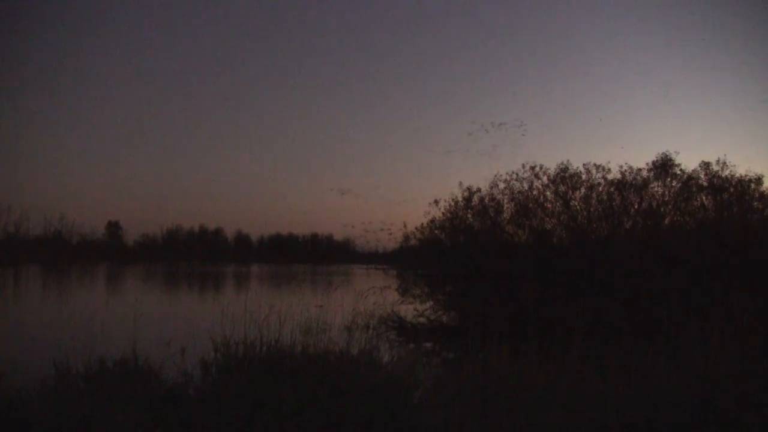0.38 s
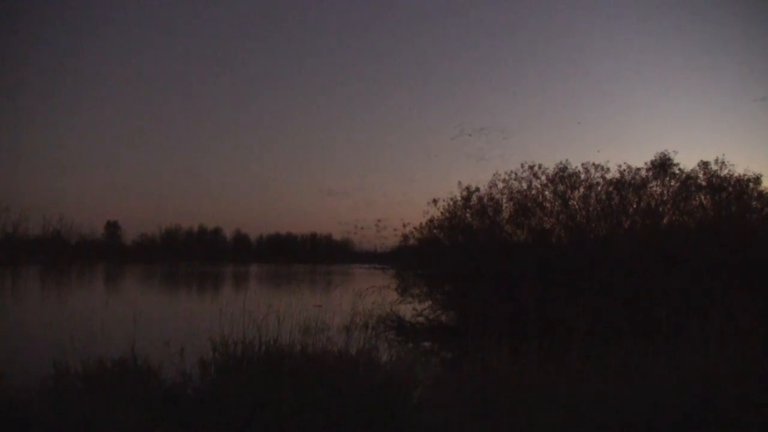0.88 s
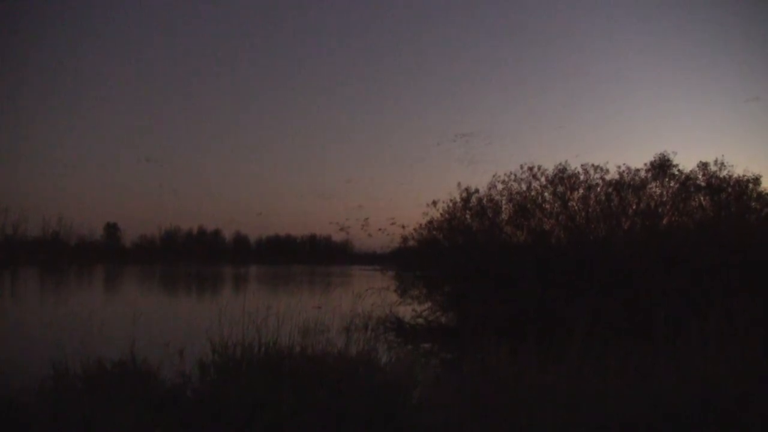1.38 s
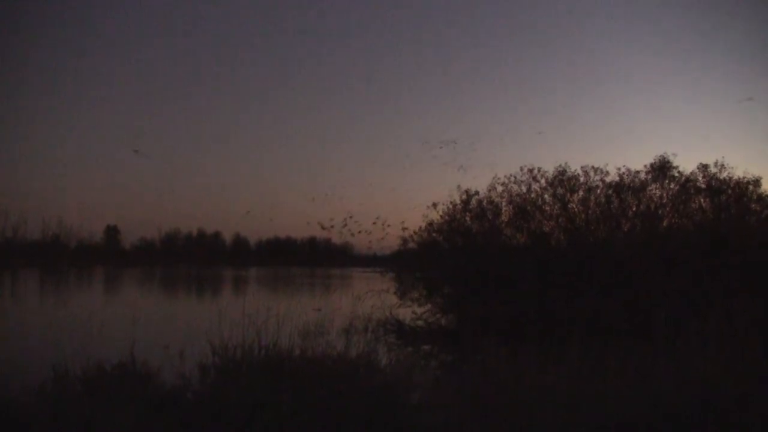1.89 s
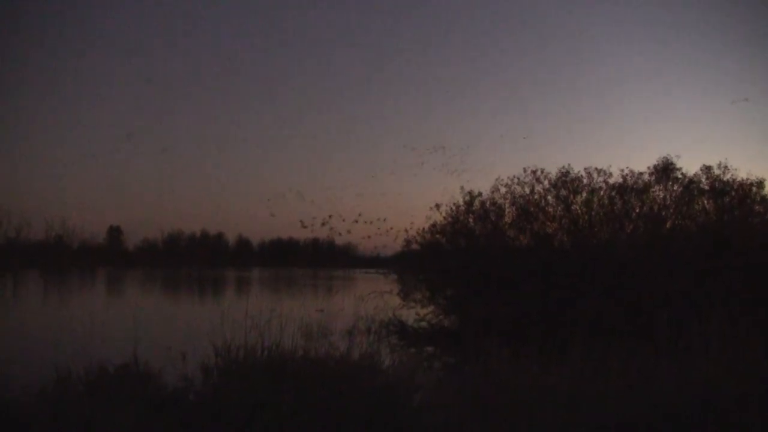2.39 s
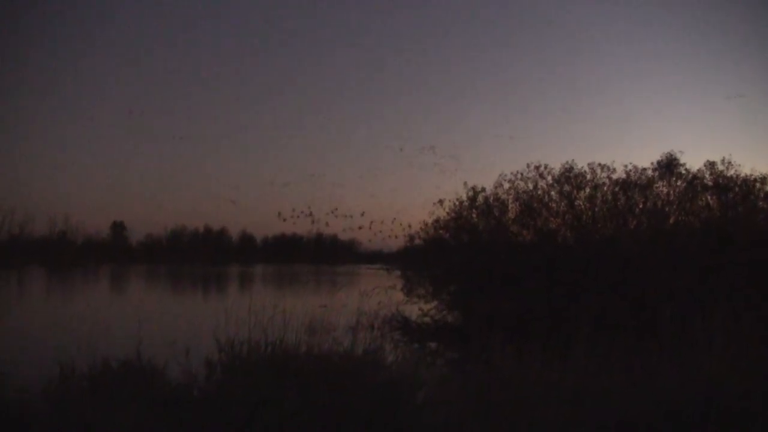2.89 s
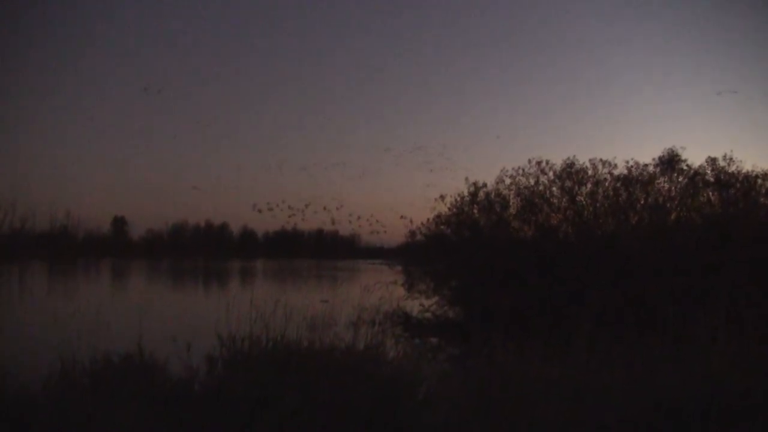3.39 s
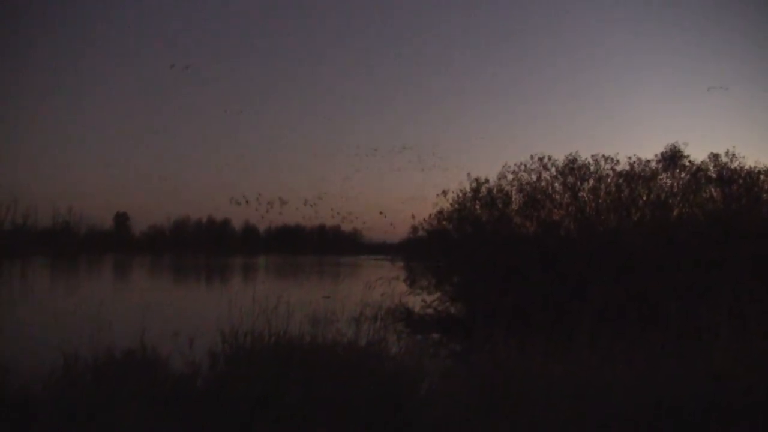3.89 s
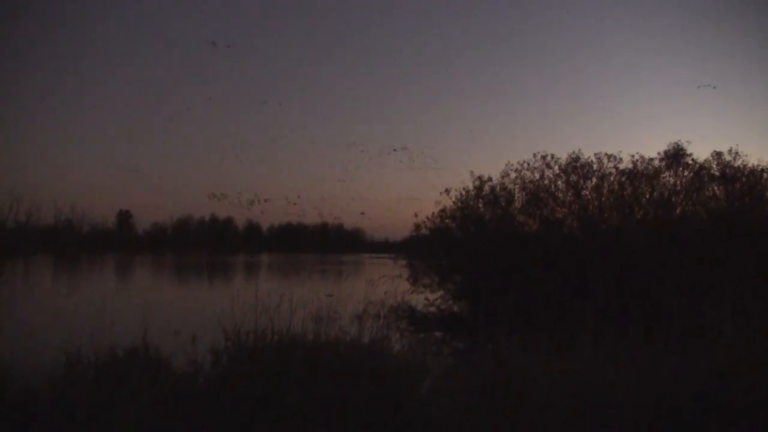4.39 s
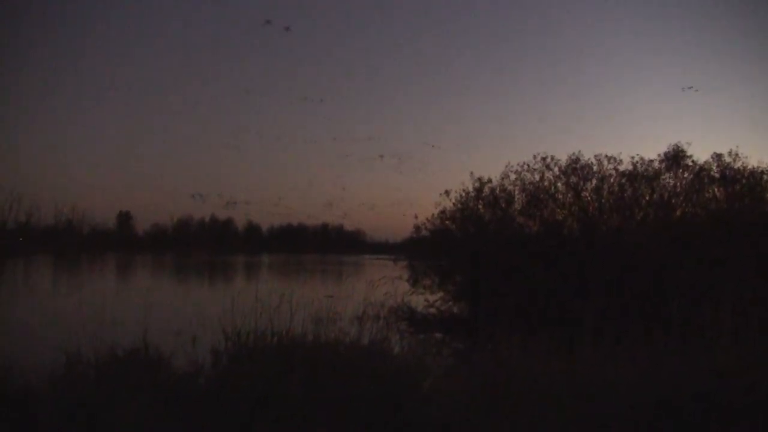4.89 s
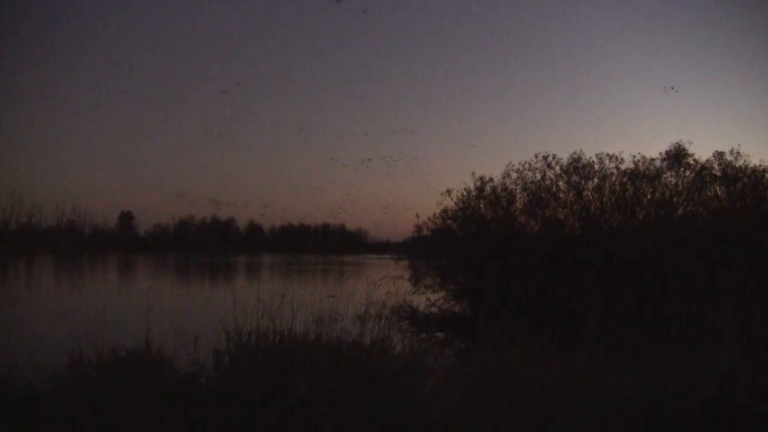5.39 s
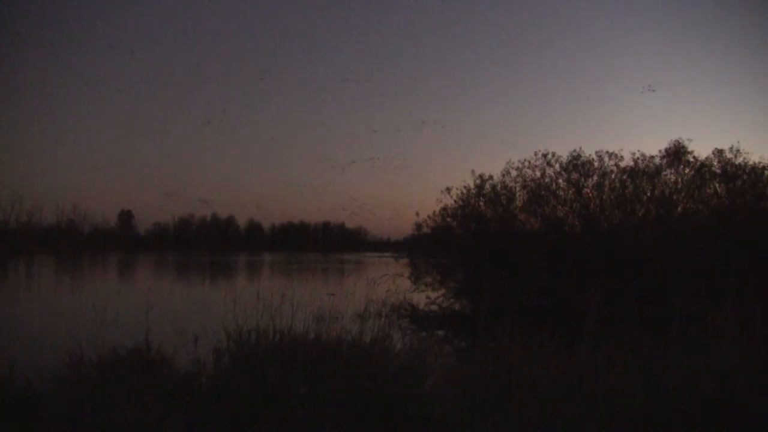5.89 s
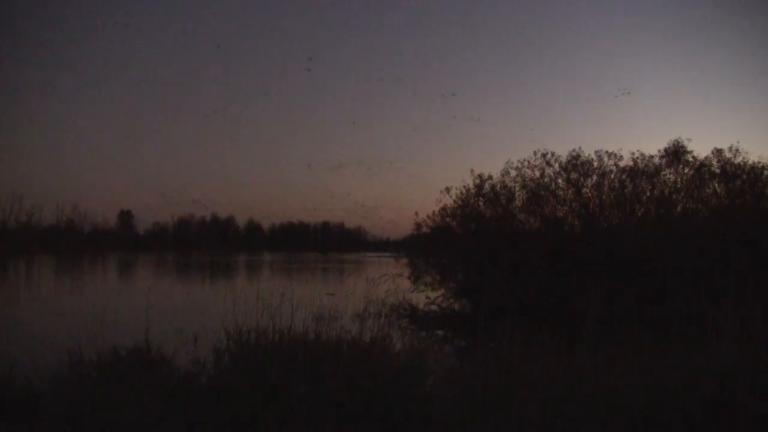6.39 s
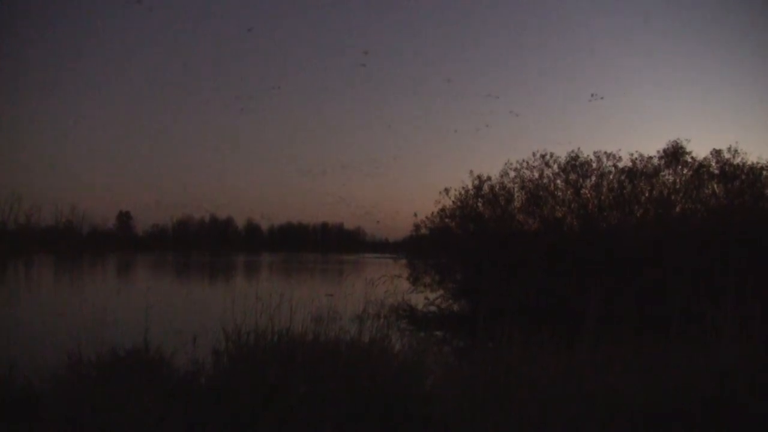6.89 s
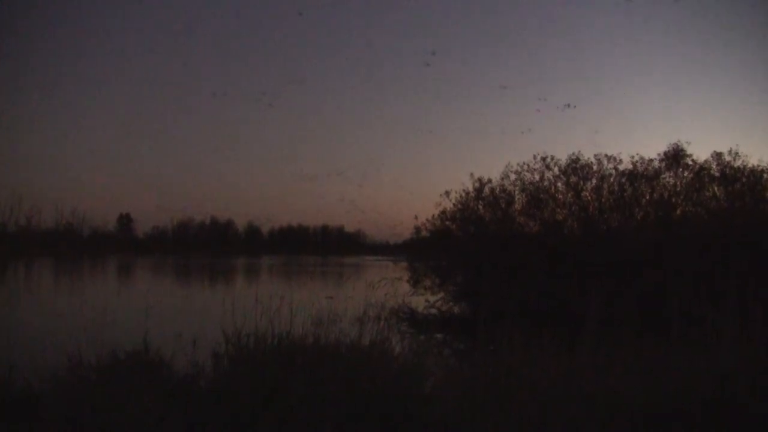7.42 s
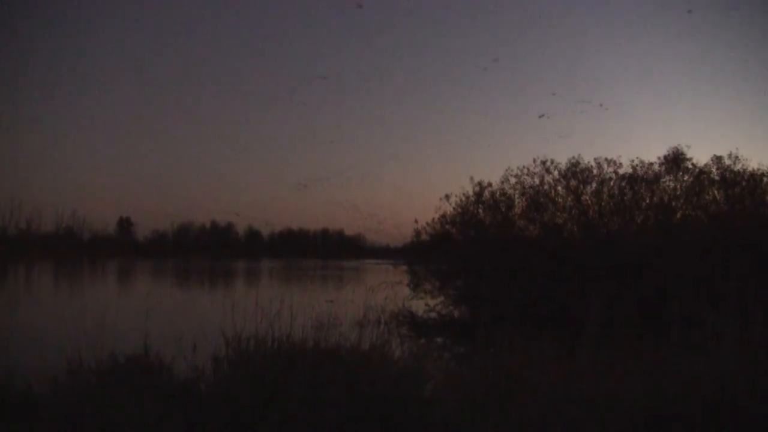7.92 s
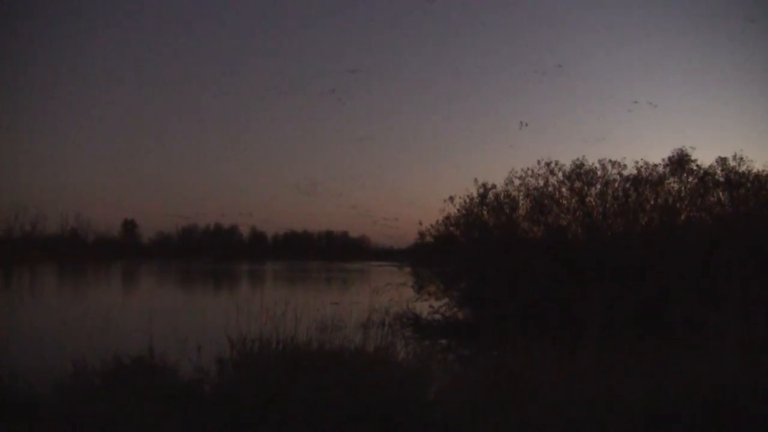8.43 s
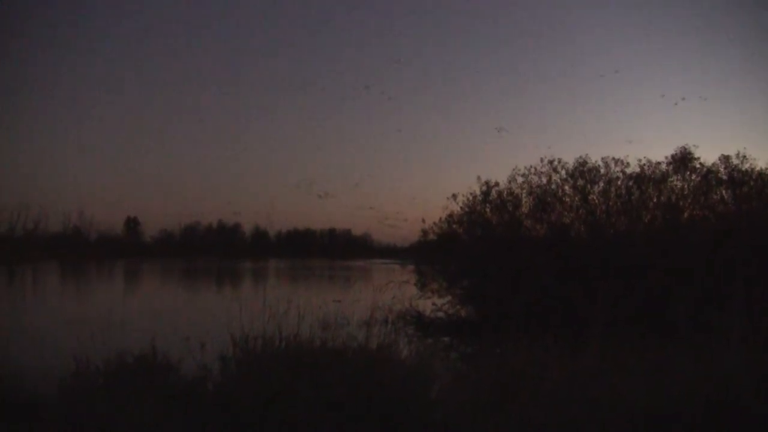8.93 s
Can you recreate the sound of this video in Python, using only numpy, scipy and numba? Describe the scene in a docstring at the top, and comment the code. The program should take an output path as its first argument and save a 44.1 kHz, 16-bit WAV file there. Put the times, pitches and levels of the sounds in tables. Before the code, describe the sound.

A large flock of geese circles over a marsh at dusk, honking continuously. Hundreds of distant short calls blur into a dense chatter, while nearer birds stand out in rapid, overlapping high and low yelps. Early on a duck passes with faint, rhythmic whistling wingbeats. Reeds and water lightly smear the echoes. A low far rumble and soft air lie underneath. Stereo outdoor microphone at a distance, birds slightly left.

```python
"""A marsh at dusk, with a large flock of geese circling over reeds and water, heard on two microphone ports.
Each honk is a short arched stack of harmonics shaped by the windpipe; nearer birds stand out one by one
over a dense far chorus that the reeds and water smear. A few voices bark, and a deeper bird calls softly.
A duck passes on wings that whistle at each downstroke. Under them lie a distant fading rumble, a drone
and a faint hum made of noise and wavering tones, soft air on the ports and the recorder's hiss."""
import sys
import numpy as np
from scipy import signal
from scipy.fft import rfft, irfft, next_fast_len
from scipy.io import wavfile
from scipy.ndimage import uniform_filter1d
from numba import njit

SR = 44100
rng = np.random.default_rng(int(sys.argv[2]) if len(sys.argv) > 2 else 0)


def gain_from_decibels(decibels):
    """Convert decibel values to linear amplitude factors."""
    exponent = np.asarray(decibels, float) / 20
    return 10 ** exponent


def transcribe(u):
    """Save the signal u as a 16-bit wav file named by the first command-line argument.

    u: samples, shape (n,) or (channels, n), limited to [-1, 1]; the rate is SR.
    q: integer samples, one column per channel.
    """
    v = np.clip(np.atleast_2d(u).T, -1, 1)
    q = np.round(v * 32767).astype(np.int16)
    wavfile.write(sys.argv[1], SR, q)


N = 398663  # samples


def curve(table):
    """Columns of a table, after its times, as values for every sample."""
    s, *columns = np.transpose(table)
    return [np.interp(np.arange(N) / SR, s, column) for column in columns]


def read(table, hz):
    """Decibels of a spectrum at the given frequencies, on a log frequency axis."""
    at_hz, db = np.transpose(table)
    return np.interp(np.log(np.maximum(hz, 1)), np.log(at_hz), db)


def level(x, db):
    """Scale to an rms level."""
    return x * gain_from_decibels(db) / np.sqrt(np.mean(x ** 2))


def colour(x, table):
    """Filter by a spectrum."""
    size = next_fast_len(N)
    gain = gain_from_decibels(read(table, np.fft.rfftfreq(size, 1 / SR)))
    return irfft(rfft(x, size) * gain, size)[:N]


def noise(table):
    """Noise with the colour of a spectrum."""
    return colour(rng.standard_normal(N), table)


def walk(rate):
    """Random levels held 1 / rate s and smoothed twice; spread near 1."""
    hold = int(SR / rate)
    steps = np.repeat(rng.standard_normal(N // hold + 1), hold)
    return 1.474 * uniform_filter1d(uniform_filter1d(steps, hold), hold)[:N]


def flutter(depth_db, rate):
    """Moving air makes each harmonic swell and fade alone; both ends settle at unit gain, to join up."""
    ends = np.minimum(1, 50 * np.sin(np.pi * np.arange(N) / N))
    return gain_from_decibels(depth_db * walk(rate) * ends)


@njit
def sing(calls, gains, wobble, shimmer, arch, edge_s):
    """Each call glides from its first to its last pitch over an arch; the harmonics share one phase."""
    out = np.zeros(len(wobble))
    for c in range(len(calls)):
        start, span = int(calls[c, 0] * SR), int(calls[c, 1] * SR)
        glide, phase = np.log(calls[c, 3] / calls[c, 2]), 0.
        stop = min(span, len(out) - start)
        for i in range(stop):
            u = i / span
            bulge = arch * calls[c, 1] ** 2 * u * (1 - u)
            own = start + i + 7919 * c  # every bird reads its own stretch of chance
            hz = calls[c, 2] * np.exp(glide * u + bulge + wobble[own % len(out)])
            phase += 2 * np.pi * hz / SR
            edge = min(min(i, stop - i) / (edge_s * SR), 1.)
            turn = np.exp(1j * phase)
            z, total = turn, 0.
            for k in range(gains.shape[1]):
                total += gains[c, k] * shimmer[(own + 3571 * k) % len(out)] * z.imag
                z *= turn  # on to the next harmonic
            out[max(start + i, 0)] += (start + i >= 0) * total * np.sin(np.pi / 2 * edge) ** 2
    return out


# windpipe and beak, gain on each harmonic: frequency_hz, gain_db
THROAT_GAIN = [(600, 0.5), (720, 0.5), (800, -2.5), (900, -7), (1150, -8), (1450, -5.5), (2080, -5.5),
               (2350, -16.5), (3000, -21), (3700, -29), (4200, -34.5), (4600, -35), (5300, -30),
               (6300, -37.5), (8000, -46), (11000, -64.5)]


def honk(calls, scatter_db, rough, edge_s, arch, low_db):
    """Each bird weighs its harmonics a little differently, distance sets the treble, the windpipe colours all.
    Columns of calls: start_s, length_s, first_pitch_hz, last_pitch_hz, level_db, treble_db."""
    first_hz, last_hz = calls[:, 2:3], calls[:, 3:4]
    hz = np.sqrt(first_hz * last_hz) * np.arange(1, 11)
    throat = gain_from_decibels(read(THROAT_GAIN, hz))
    heard = throat * gain_from_decibels(scatter_db * rng.standard_normal(hz.shape)) * (hz < 12000)
    heard *= gain_from_decibels(low_db * (hz < 1150))  # low voices put their strength in the second harmonic
    body, treble = hz < 2500, hz > 4650
    heard /= np.sqrt(np.sum((heard * body) ** 2, axis=1) / 2)[:, None]
    lift_db = calls[:, 5:] - 10 * np.log10(np.sum((heard * treble) ** 2, axis=1) / 2)[:, None]
    # steep slides sound duller than level notes
    slide = np.abs(np.log(last_hz / first_hz)) / calls[:, 1:2]
    lift_db -= 7 * np.maximum(slide - 1.5, 0)
    # the middle harmonics are weak and take a share of the treble's change
    heard *= gain_from_decibels(-2.5 * ~(body | treble))
    share = np.where(treble, 1, np.where(body, 0, 0.15))
    heard *= gain_from_decibels(calls[:, 4:5] + lift_db * share)
    # the windpipe stays put while the harmonics glide through it
    source = sing(calls, heard / throat, rough * walk(250), flutter(2.6, 45), arch, edge_s)
    return colour(source, THROAT_GAIN)


# voices in the far chorus, levels against each other, glide as usual slope of log pitch:
# lowest_pitch_hz, highest_pitch_hz, honks_per_s (about), level_db, glide_per_s
FAR_VOICES = [(733, 960, 110, -1.5, 0.6), (960, 1110, 80, -5.5, 0.22), (1157.3, 1700, 90, -3, -0.353)]
# loudness of the whole far chorus before it is placed: time_s, level_db
CHORUS_LEVEL = [(0.0, -36.5), (0.98, -35), (1.5, -36), (2.6, -36), (4.6, -36), (5.46, -35.5), (5.8, -36),
                (6.27, -35), (7.5, -35), (8.79, -35.5), (9.04, -36)]


def far_flock():
    """Hundreds of far birds honk at random moments, pitches and strengths."""
    rows = []
    for low_hz, high_hz, rate, voice_db, lean in FAR_VOICES:
        even = rng.random((int(rate * N / SR), 3)).T
        bell = rng.standard_normal((len(even[0]), 3)).T
        length_s = 0.045 + 0.055 * even[1]
        # the birds take turns evenly, some already calling at the start
        turn = (np.arange(len(length_s)) + even[0]) / len(length_s)
        start_s = turn * (N / SR + 0.1) - 0.1
        hz = low_hz * (high_hz / low_hz) ** even[2]
        half_glide = np.exp(length_s / 2 * (lean + 1.5 * bell[0]))
        level_db = voice_db + 1.8 * bell[1]
        treble_db = -30.5 + 1.3 * bell[2]
        rows.append(np.transpose([start_s, length_s, hz / half_glide, hz * half_glide, level_db, treble_db]))
    chorus = honk(np.vstack(rows), scatter_db=2.5, rough=0.006, edge_s=0.0066, arch=50., low_db=-1.5)
    return level(chorus, 0) * gain_from_decibels(curve(CHORUS_LEVEL)[0])


# nearer birds, level before they are placed, treble against it before steep slides dull it:
# start_s, first_pitch_hz, last_pitch_hz, level_db, treble_db
NEAR_HONKS = [(0.0, 1040, 990, -39.5, -22), (0.035, 933, 1028, -41, -40), (0.093, 860, 997, -47, -43),
              (0.125, 868, 1047, -42, -38), (0.19, 1060, 1075, -41.5, -36), (0.201, 1430, 1424, -42, -39),
              (0.239, 957, 928, -34.5, -30), (0.239, 1563, 1637, -37, -28), (0.244, 788, 898, -36.5, -31),
              (0.258, 1468, 1347, -39, -22), (0.272, 873, 914, -33, -23), (0.314, 1620, 1550, -38, -28),
              (0.339, 885, 867, -42, -23), (0.358, 1000, 966, -35.5, -31), (0.425, 1008, 1070, -42.5, -19),
              (0.428, 922, 950, -40, -34), (0.512, 1476, 1470, -41, -41), (0.587, 1018, 1008, -37, -37),
              (0.617, 1050, 1081, -36, -26), (0.635, 1118, 1100, -38.5, -30), (0.635, 1460, 1400, -44, -22),
              (0.688, 790, 913, -35.5, -31), (0.709, 1120, 1136, -41, -30), (0.712, 898, 913, -37, -28),
              (0.731, 1286, 1210, -45, -18), (0.733, 1520, 1330, -43, -33), (0.75, 1636, 1540, -38.5, -37),
              (0.799, 784, 765, -41, -34), (0.874, 834, 794, -49, -17), (0.877, 818, 768, -47.5, -30),
              (0.922, 954, 1005, -38.5, -44), (0.961, 1370, 1563, -48, -36), (0.982, 873, 930, -40.5, -24),
              (0.992, 1020, 1110, -37.5, -21), (1.048, 1493, 1438, -36, -28),
              (1.091, 1008, 1031, -32.5, -30), (1.131, 1650, 1520, -41, -46),
              (1.191, 1058, 1143, -38.5, -25), (1.266, 916, 965, -43, -30), (1.29, 1010, 1043, -38, -25),
              (1.373, 1380, 1417, -37.5, -34), (1.376, 1090, 1140, -46, -29), (1.674, 1470, 1433, -34, -31),
              (1.717, 1447, 1410, -36.5, -21), (1.742, 1360, 1330, -39, -33), (1.746, 782, 886, -37, -27),
              (1.8, 880, 1064, -37.5, -19), (1.838, 1342, 1340, -39, -22), (1.861, 1074, 1110, -40, -26),
              (1.967, 1629, 1530, -43.5, -37), (2.02, 811, 912, -40, -37), (2.077, 1540, 1576, -39, -44),
              (2.275, 1629, 1540, -40.5, -29), (2.31, 1007, 1071, -34.5, -27),
              (2.349, 872, 1058, -41.5, -20), (2.383, 763, 810, -39, -40), (2.454, 793, 745, -41, -42),
              (2.454, 1036, 970, -38.5, -41), (2.499, 1116, 1124, -40.5, -37), (2.54, 927, 1095, -41, -21),
              (2.718, 785, 905, -41.5, -30), (2.727, 1538, 1520, -41, -35), (2.736, 970, 977, -36, -29),
              (2.777, 1335, 1303, -33, -30), (2.815, 1290, 1215, -45, -36), (2.856, 830, 915, -39.5, -44),
              (3.029, 1014, 1039, -37.5, -29), (3.092, 803, 825, -41, -31), (3.149, 1076, 1067, -40, -27),
              (3.173, 1422, 1454, -43, -44), (3.185, 1530, 1506, -39, -44), (3.254, 900, 903, -45.5, -39),
              (3.326, 1260, 1340, -45, -21), (3.327, 1440, 1484, -36, -39), (3.346, 1100, 1117, -43, -22),
              (3.385, 790, 836, -44, -42), (3.463, 720, 795, -41, -44), (3.511, 914, 987, -38.5, -25),
              (3.53, 1025, 983, -46.5, -24), (3.535, 738, 820, -38, -33), (3.553, 1040, 986, -36, -30),
              (3.606, 1455, 1380, -40, -19), (3.664, 904, 904, -52, -32), (3.699, 852, 857, -38.5, -34),
              (3.727, 928, 960, -35.5, -31), (3.744, 883, 843, -37.5, -29), (3.756, 1675, 1540, -37, -34),
              (3.765, 1403, 1343, -34.5, -30), (3.783, 1031, 1028, -40.5, -35),
              (3.798, 1077, 1086, -38, -34), (3.814, 1356, 1320, -42, -31), (3.887, 872, 902, -37, -46),
              (3.9, 1405, 1470, -38, -44), (3.945, 990, 905, -38, -28), (3.966, 1076, 1050, -41, -23),
              (3.966, 1324, 1230, -37, -26), (3.996, 1000, 1001, -38, -28), (4.101, 1002, 1010, -42, -44),
              (4.105, 1510, 1480, -33.5, -44), (4.133, 1286, 1513, -43, -39),
              (4.201, 1472, 1362, -36.5, -19), (4.367, 1357, 1378, -41.5, -44),
              (4.391, 797, 845, -37.5, -41), (4.397, 973, 1070, -35.5, -35), (4.466, 1090, 1030, -41, -34),
              (4.526, 1010, 990, -38, -44), (4.544, 1399, 1190, -43, -26), (4.648, 840, 807, -39, -46),
              (4.711, 800, 776, -42, -33), (4.746, 1426, 1400, -38.5, -34), (4.804, 1590, 1520, -41, -44),
              (4.825, 854, 818, -38.5, -47), (4.864, 1327, 1176, -42.5, -47), (5.012, 830, 819, -41, -44),
              (5.059, 799, 848, -35.5, -42), (5.082, 1185, 1136, -41, -40), (5.121, 914, 983, -37.5, -30),
              (5.127, 1390, 1475, -40.5, -36), (5.151, 1270, 1334, -42.5, -20),
              (5.157, 857, 1019, -38, -30), (5.219, 1430, 1335, -34.5, -25), (5.274, 1426, 1407, -40, -51),
              (5.319, 1006, 1010, -41, -32), (5.334, 883, 820, -38.5, -36), (5.349, 1540, 1440, -42, -29),
              (5.371, 900, 973, -35, -50), (5.409, 1042, 1015, -34.5, -30), (5.415, 777, 837, -39, -43),
              (5.457, 1250, 1172, -39, -41), (5.499, 1336, 1290, -41, -27), (5.642, 1380, 1440, -38.5, -37),
              (5.666, 840, 800, -43, -46), (5.736, 846, 830, -40.5, -37), (5.78, 873, 906, -40.5, -40),
              (5.873, 878, 820, -37.5, -34), (5.935, 1297, 1187, -42, -41), (6.022, 805, 764, -40.5, -38),
              (6.04, 928, 1014, -39, -33), (6.1, 1020, 1022, -41, -26), (6.139, 724, 900, -36.5, -34),
              (6.189, 808, 845, -39.5, -33), (6.225, 866, 960, -50, -38), (6.25, 1281, 1276, -45, -23),
              (6.253, 1015, 1027, -36, -28), (6.293, 1080, 1038, -38.5, -38),
              (6.336, 1440, 1592, -45.5, -35), (6.346, 962, 980, -38, -37), (6.376, 1035, 1065, -37, -25),
              (6.444, 875, 908, -37.0, -32), (6.542, 946, 952, -37, -26), (6.552, 757, 896, -37, -33),
              (6.552, 1360, 1175, -39, -32), (6.615, 1450, 1410, -38, -40), (6.69, 1383, 1413, -40, -19),
              (6.73, 1407, 1320, -42.5, -26), (6.753, 988, 1052, -37.5, -39), (6.768, 890, 851, -39, -33),
              (6.767, 971, 935, -40, -31), (6.827, 1184, 1200, -43, -36), (6.829, 1456, 1410, -41, -42),
              (6.845, 1020, 1080, -36, -37), (6.908, 797, 846, -40, -44), (6.947, 1438, 1500, -38.5, -44),
              (6.995, 760, 847, -37, -37), (7.019, 959, 1025, -35.5, -31), (7.037, 954, 900, -38.5, -27),
              (7.05, 1405, 1675, -37.5, -32), (7.061, 795, 915, -37.5, -28),
              (7.067, 1303, 1220, -38.5, -27), (7.169, 1220, 1177, -43, -38),
              (7.155, 905, 1058, -43.5, -35), (7.202, 970, 1028, -41, -31), (7.229, 1200, 1256, -41, -34),
              (7.25, 1593, 1364, -39.5, -46), (7.321, 1534, 1690, -46, -24),
              (7.348, 1326, 1236, -41.5, -20), (7.354, 1295, 1260, -47, -22),
              (7.396, 858, 1112, -42.5, -22), (7.405, 925, 1090, -43.5, -16), (7.516, 1140, 1215, -44, -26),
              (7.555, 810, 837, -37.5, -39), (7.591, 980, 900, -50, -35), (7.639, 1010, 1022, -36, -44),
              (7.642, 817, 957, -36.5, -42), (7.651, 1280, 1280, -39, -43), (7.696, 1016, 1030, -38, -24),
              (7.71, 907, 890, -42, -34), (7.737, 1510, 1440, -41, -30), (7.743, 1232, 1238, -40.5, -19),
              (7.775, 879, 975, -38.5, -34), (7.794, 1415, 1300, -37.5, -36), (7.797, 982, 980, -35, -32),
              (7.83, 1060, 1065, -36.5, -33), (7.851, 1612, 1586, -37, -31), (7.872, 964, 950, -35, -36),
              (7.893, 1610, 1684, -34.5, -39), (7.977, 973, 937, -40, -40), (8.013, 830, 745, -36.5, -45),
              (8.031, 876, 860, -35.5, -34), (8.076, 1410, 1327, -40, -26), (8.088, 1250, 1154, -36.5, -31),
              (8.094, 1675, 1587, -40, -32), (8.098, 1595, 1336, -36, -44), (8.15, 1046, 1082, -36.5, -43),
              (8.171, 895, 816, -37.5, -33), (8.171, 1007, 1020, -41, -31), (8.201, 953, 990, -35.5, -36),
              (8.264, 1277, 1278, -40, -47), (8.36, 866, 856, -43.5, -18), (8.381, 1310, 1235, -38.5, -22),
              (8.429, 1254, 1280, -39, -41), (8.435, 1565, 1540, -38.5, -39),
              (8.468, 1014, 1046, -32.5, -33), (8.53, 1536, 1544, -35, -37), (8.555, 833, 976, -40, -40),
              (8.573, 1254, 1320, -38.5, -34), (8.581, 735, 851, -42, -21), (8.587, 812, 987, -36, -35),
              (8.59, 966, 1017, -39.5, -22), (8.632, 1187, 1247, -40.5, -16), (8.638, 765, 960, -52, -21),
              (8.638, 978, 1023, -33.5, -26), (8.686, 1608, 1712, -37.5, -26), (8.689, 1023, 943, -37, -30),
              (8.698, 874, 880, -37, -30), (8.719, 1220, 1313, -37.5, -40), (8.743, 1417, 1412, -36.5, -37),
              (8.746, 960, 914, -43, -31), (8.773, 839, 885, -39, -40), (8.812, 805, 814, -36.5, -44),
              (8.917, 1740, 1630, -39.5, -30), (8.929, 1060, 1117, -43, -21), (8.929, 1200, 1220, -38, -21),
              (8.971, 1310, 1210, -38, -38), (8.98, 1002, 990, -39.5, -38), (8.989, 1080, 1100, -40.5, -26)]


def near_honks():
    """The loudest honks one by one; a honk lasts longer the further its log pitch slides."""
    honks = np.array(NEAR_HONKS, float)
    length_s = 0.0549 + 0.158 * np.abs(np.log(honks[:, 2] / honks[:, 1]))
    calls = np.insert(honks, 1, length_s, axis=1)
    return honk(calls, scatter_db=1.5, rough=0.0044, edge_s=0.0075, arch=21, low_db=-7.0)


def reeds(x, t60_s, dull_hz):
    """Reeds, trees and water scatter a fading spray of echoes, renewed every 0.2 s as the birds move."""
    hop = SR // 5
    t = np.arange(int(t60_s * SR)) / SR
    fade, padded = np.hanning(2 * hop), np.pad(x, (hop, 2 * hop))
    pieces = np.array([padded[at:at + 2 * hop] * fade for at in range(0, N + hop, hop)])
    spray = rng.standard_normal((len(pieces), len(t))) * 1000 ** (-t / t60_s)
    spray = signal.lfilter(*signal.butter(1, dull_hz, fs=SR), spray)
    spray /= np.sqrt(np.mean(np.sum(spray ** 2, axis=1)))
    echoes = signal.fftconvolve(pieces, spray, axes=1)
    out = np.zeros(N + 4 * hop + len(t))
    for k, echo in enumerate(echoes):
        out[k * hop:k * hop + len(echo)] += echo
    return out[hop:hop + N]


# distant low rumble, one source for both ports, relative: frequency_hz, density_db (per Hz)
RUMBLE_COLOUR = [(25, -29.5), (50, -17), (70, -6), (110, -2.5), (200, -1), (300, -4), (500, 1), (700, -1),
                 (1500, -9), (4000, -42.5)]
# the rumble fades as its source moves off, before the mix gain: time_s, level_db
RUMBLE_LEVEL = [(0.0, -49), (9.04, -53)]


def distant_rumble():
    """Low coloured noise that fades as its source moves off."""
    return level(noise(RUMBLE_COLOUR), 0) * gain_from_decibels(curve(RUMBLE_LEVEL)[0])


# drone that sinks as its source moves off, rms before the mix gain: time_s, pitch_hz, level_db
DRONE_PATH = [(0.0, 147.5, -62), (2.79, 136, -69.5), (9.04, 117.4, -65)]


def distant_drone():
    """A low sine far off, wavering in pitch and level."""
    hz, db = curve(DRONE_PATH)
    phase = 2 * np.pi * np.cumsum(hz * (1 + 0.02 * walk(10))) / SR
    return np.sqrt(2) * gain_from_decibels(db + 1.1 * walk(13)) * np.sin(phase)


def faint_hum():
    """A faint sine near 270 Hz, wavering a little in pitch and level."""
    phase = 2 * np.pi * np.cumsum(270 * (1 + 0.0055 * walk(8.8))) / SR
    return np.sqrt(2) * gain_from_decibels(-67.5 + 2.5 * walk(6)) * np.sin(phase)


# left port against right for the low sounds: frequency_hz, gain_db
LOW_LEAN = [(60, 2.5), (130, -3), (250, 3), (700, 5.5), (3000, 1.5)]


def on_both_ports(low):
    """One low source reaches both ports, the left coloured against the right."""
    return np.array([colour(low, LOW_LEAN), low])


# air on the ports, relative: frequency_hz, density_db (per Hz)
AIR_COLOUR = [(30, -30), (64, -20.5), (137, -13.5), (243, 0), (467, -4.5), (800, -4.5), (1500, -23.5),
              (3000, -21.5), (6000, -30.5), (10000, -42), (15500, -58.5)]
# the air calms, gain on each port's own level: time_s, gain_db
AIR_GAIN = [(0.0, 1), (9.04, -2)]


def port_air():
    """Soft air makes unrelated coloured noise on the left and right ports."""
    ports = np.array([level(noise(AIR_COLOUR), port_db) for port_db in (-49.5, -52.5)])
    return ports * gain_from_decibels(curve(AIR_GAIN)[0])


def recorder_hiss():
    """The recorder's hiss: unrelated noise in each channel, softened above 11 kHz, at -70.5 dB rms."""
    white = rng.standard_normal((2, N))
    return level(signal.lfilter(*signal.butter(1, 11000, fs=SR), white), -70.5)


# a duck flies past, peak levels of whistle and octave before it is placed:
# time_s, whistle_hz, level_db, octave_db
DUCK_PASS = [(0, 4460, -63, -77), (.55, 4520, -64, -73), (.9, 4630, -55, -69), (1.6, 4470, -59, -73),
             (2.1, 4300, -57, -73), (3, 4150, -62, -80), (5.4, 4085, -66, -82), (6.2, 4100, -80, -87)]


def duck():
    """One short breathy whistle on each downstroke; the beat follows the pitch as the duck passes."""
    hz, db, octave_db = curve(DUCK_PASS)
    first_beat_s, cycles_per_beat = 0.135, 622
    beat = (np.cumsum(hz) / SR - first_beat_s * hz[0]) / cycles_per_beat
    stroke = np.exp(-((beat - np.round(beat)) / 0.16) ** 2) * gain_from_decibels(1.3 * walk(13))
    phase = 2 * np.pi * np.cumsum(hz * (1 + 0.0065 * walk(300))) / SR  # fast wobble gives the breath
    return stroke * (gain_from_decibels(db) * np.sin(phase) + gain_from_decibels(octave_db) * np.sin(2 * phase))


# voices that break into a rasping bark, level before they are placed:
# start_s, length_s, first_pitch_hz, last_pitch_hz, level_db
RASPING_BARKS = [(0.302, 0.024, 1086, 1130, -34), (0.742, 0.028, 1063, 1125, -35),
                 (1.062, 0.028, 1020, 960, -31)]


def barks():
    """A few very short honks, roughened by a stronger pitch wobble."""
    calls = np.array(RASPING_BARKS, float)
    calls = np.column_stack([calls, np.full(len(calls), -21.5)])  # treble_db
    return honk(calls, scatter_db=1.5, rough=0.015, edge_s=0.004, arch=55.0, low_db=-7.0)


# a deeper bird, soft and round, rms of the first harmonic before it is placed:
# start_s, length_s, first_pitch_hz, last_pitch_hz, level_db
DEEP_CALLS = [(3.71, 0.08, 505, 437, -50), (3.84, 0.08, 588, 659, -44.5), (3.9, 0.1, 453, 528, -52),
              (4.158, 0.071, 557, 662, -52), (4.672, 0.064, 616, 680, -51), (4.989, 0.12, 590, 695, -49),
              (6.459, 0.12, 560, 663, -51), (6.5, 0.128, 488, 446, -47), (7.99, 0.1, 498, 456, -51)]


def low_calls():
    """Nearly pure gliding notes with two weaker overtones."""
    calls = np.array(DEEP_CALLS, float)
    gains = np.sqrt(2) * gain_from_decibels(calls[:, 4:] + np.array([0, -6, -9]))
    return sing(calls, gains, 0.0032 * walk(150), flutter(3.0, 40), arch=7.4, edge_s=0.0075)


def scene():
    """The birds lie a little to the left; the low sounds share one source for both ports."""
    far = far_flock()
    near = near_honks() + barks() + low_calls()
    tail = gain_from_decibels(-20) * near + gain_from_decibels(-15) * far
    birds = gain_from_decibels(-1.12) * near + far + reeds(tail, t60_s=0.49, dull_hz=3000) + duck()
    spread = gain_from_decibels(-20) * reeds(tail, t60_s=0.6, dull_hz=2500)
    low = gain_from_decibels(2.5) * on_both_ports(distant_rumble() + distant_drone() + faint_hum())
    side = np.array([[1], [-1]])  # left, right
    placed = birds * gain_from_decibels(1.2 * side)
    widened = spread * side  # opposite polarity on the two ports
    return placed + widened + low + port_air() + recorder_hiss()


def band_limit(x):
    """A steep low-pass at the top of the band."""
    return signal.sosfilt(signal.butter(12, 15660, fs=SR, output="sos"), x)


def record(dry):
    """The recorder takes the two ports as left and right channels."""
    return band_limit(dry)


dry = scene()
out = record(dry)
transcribe(out)
```